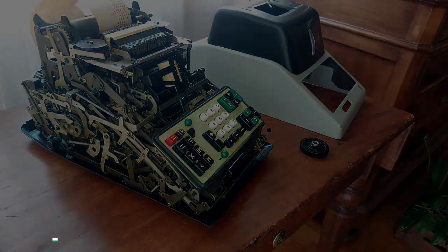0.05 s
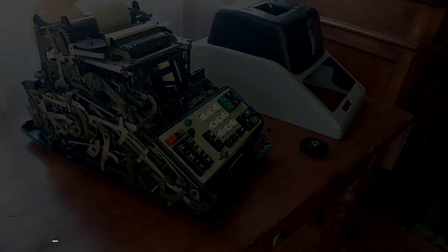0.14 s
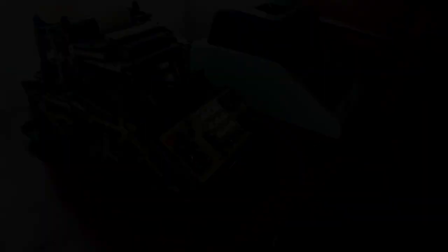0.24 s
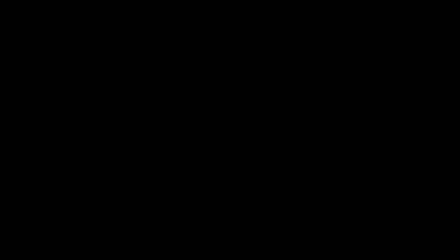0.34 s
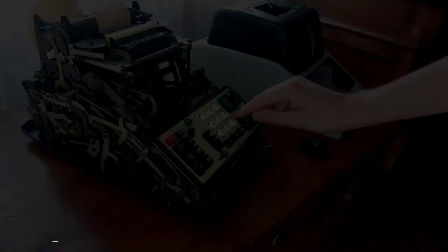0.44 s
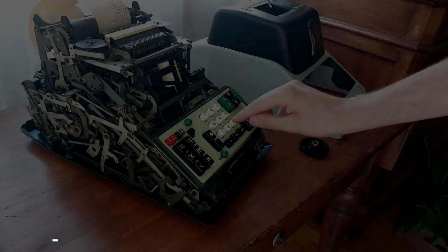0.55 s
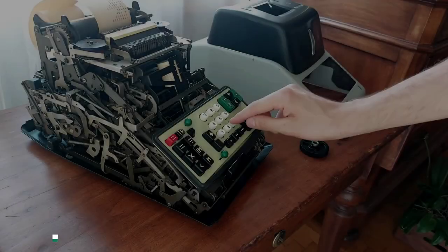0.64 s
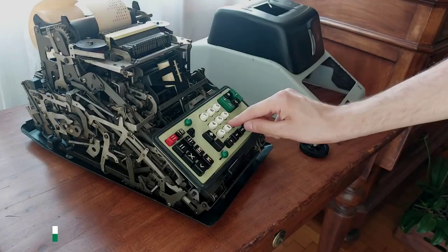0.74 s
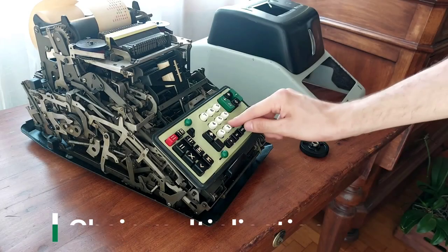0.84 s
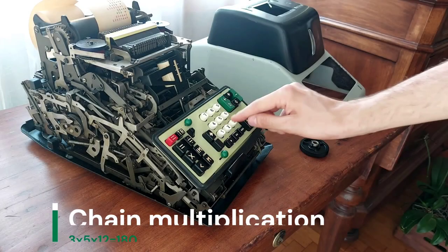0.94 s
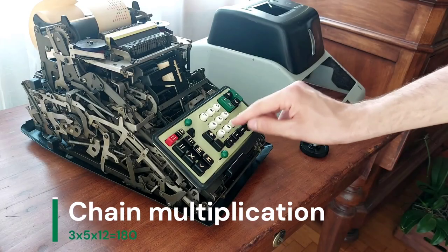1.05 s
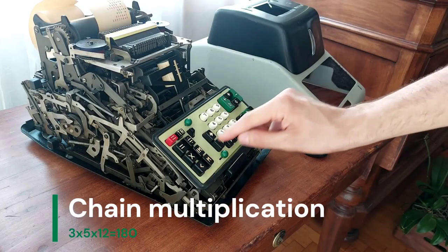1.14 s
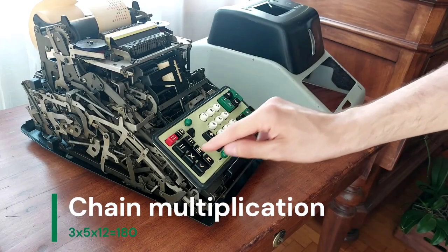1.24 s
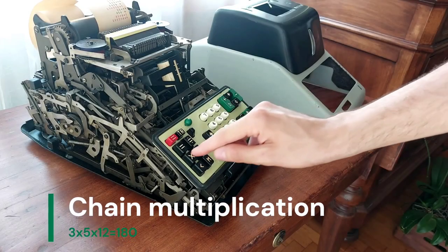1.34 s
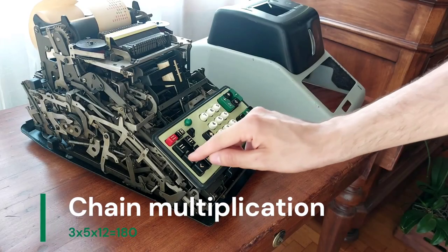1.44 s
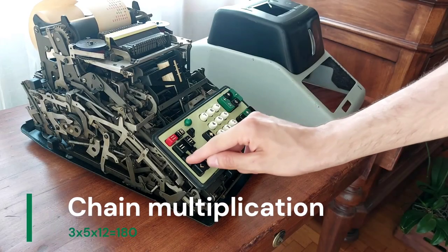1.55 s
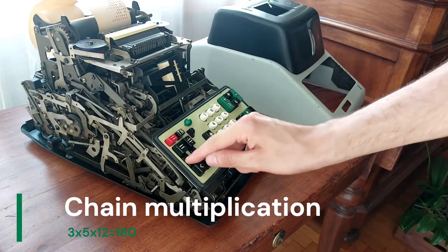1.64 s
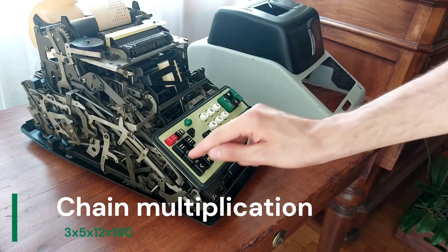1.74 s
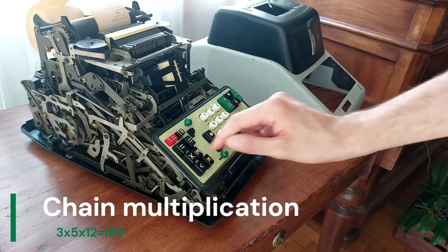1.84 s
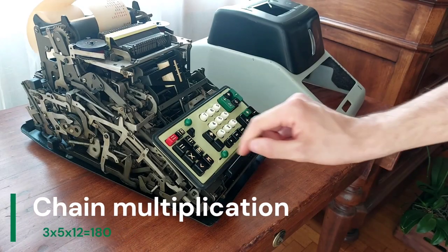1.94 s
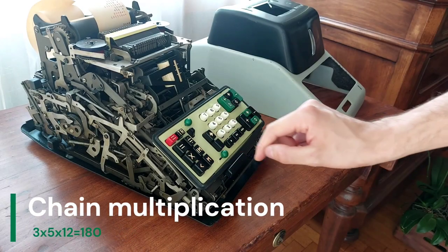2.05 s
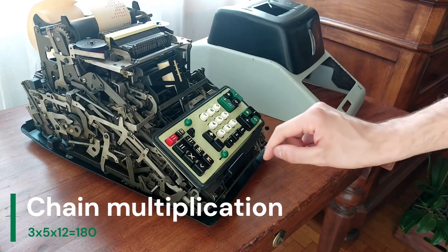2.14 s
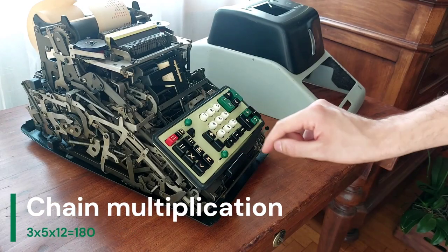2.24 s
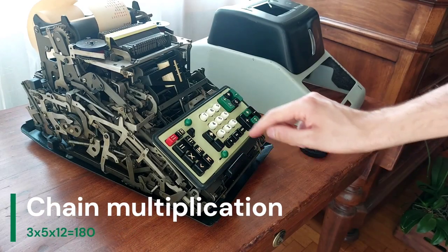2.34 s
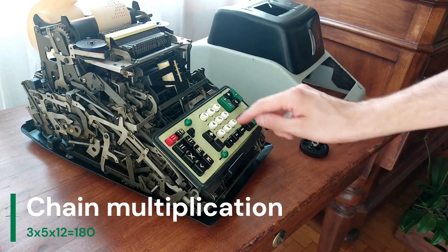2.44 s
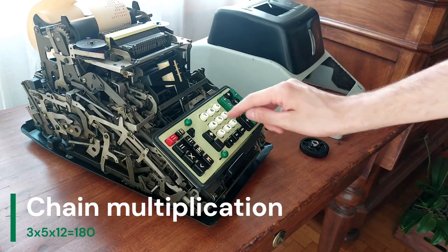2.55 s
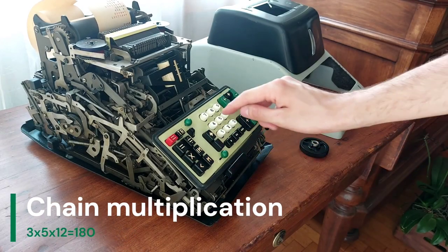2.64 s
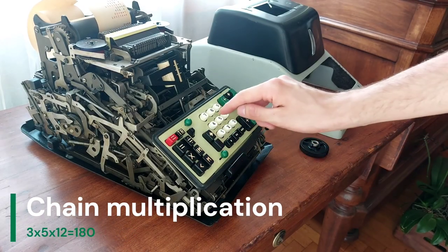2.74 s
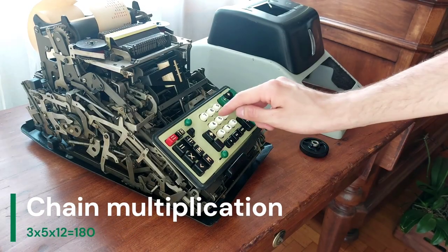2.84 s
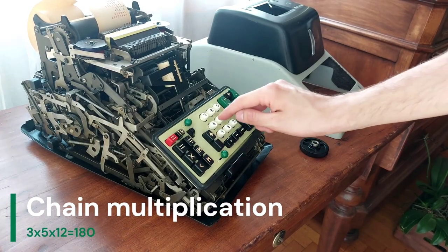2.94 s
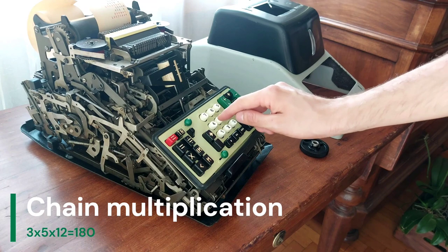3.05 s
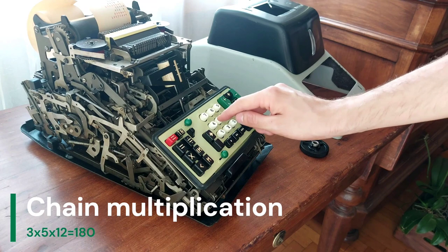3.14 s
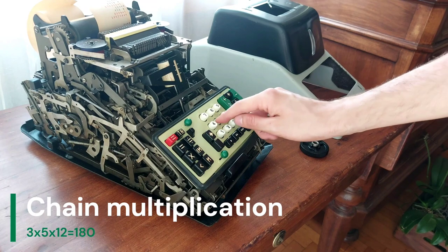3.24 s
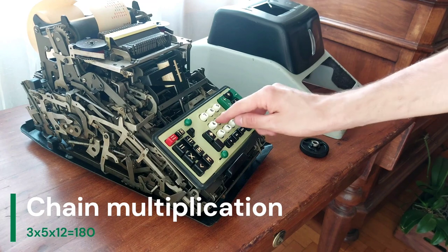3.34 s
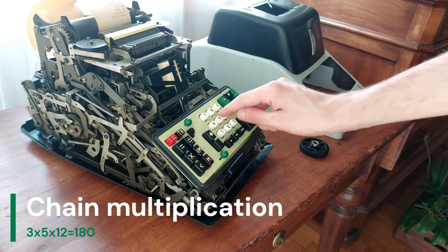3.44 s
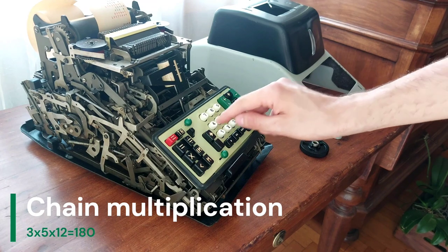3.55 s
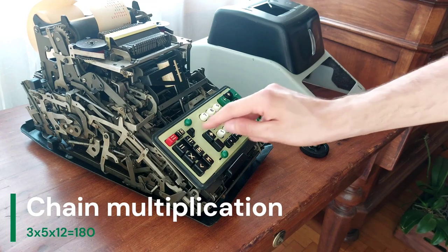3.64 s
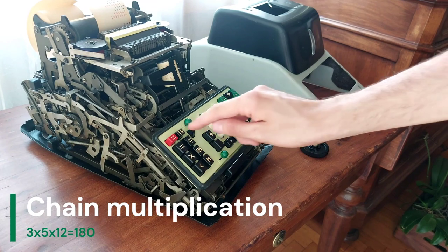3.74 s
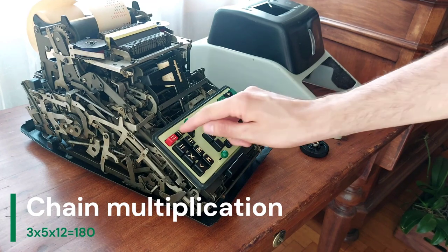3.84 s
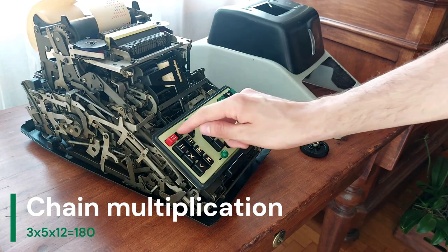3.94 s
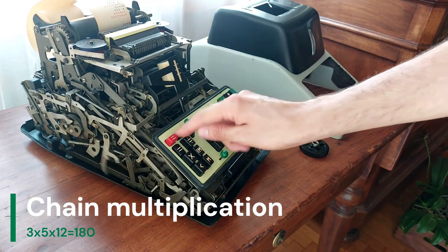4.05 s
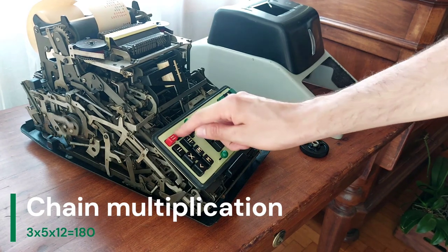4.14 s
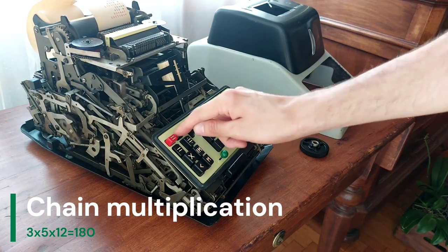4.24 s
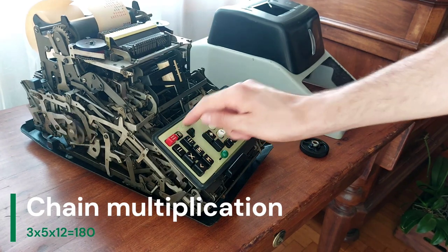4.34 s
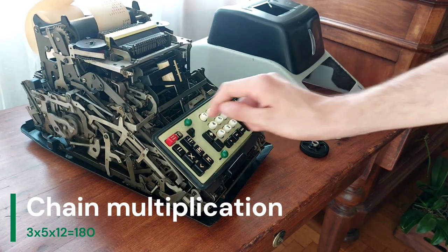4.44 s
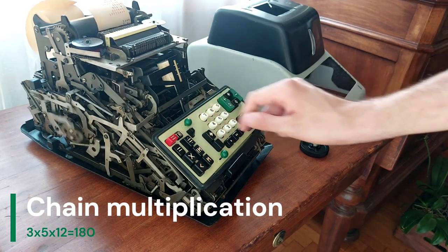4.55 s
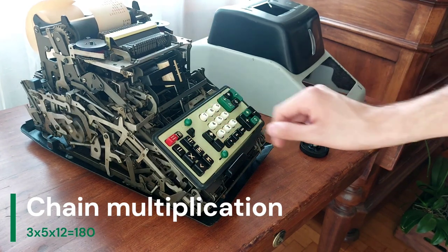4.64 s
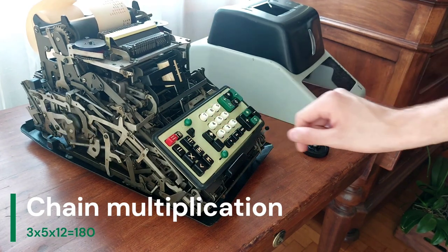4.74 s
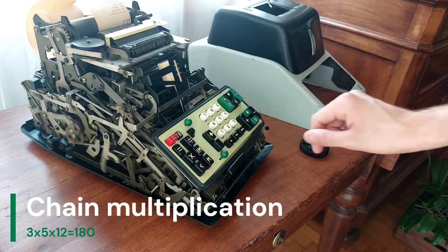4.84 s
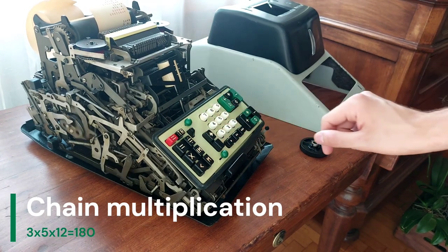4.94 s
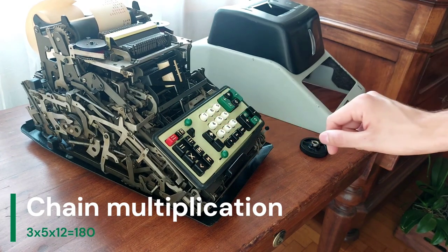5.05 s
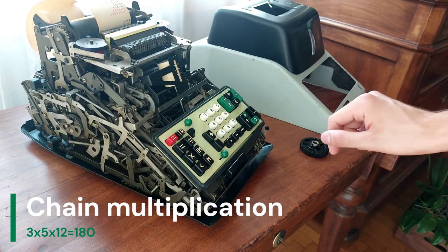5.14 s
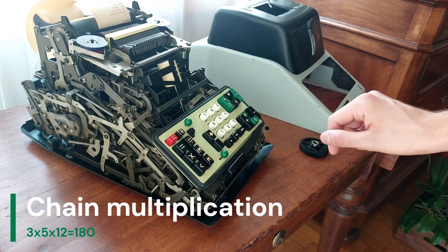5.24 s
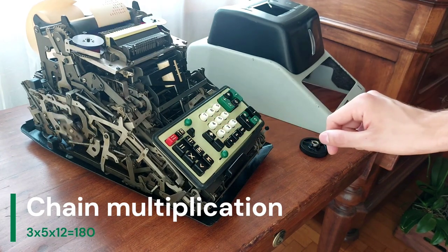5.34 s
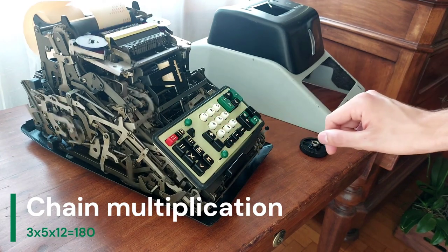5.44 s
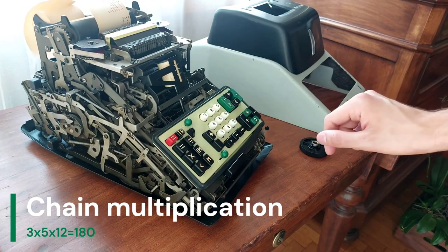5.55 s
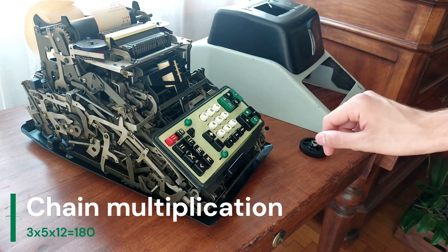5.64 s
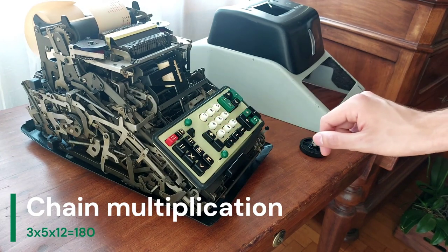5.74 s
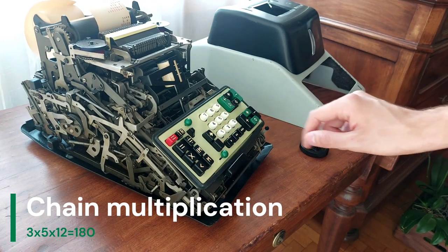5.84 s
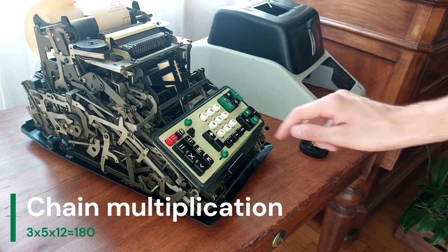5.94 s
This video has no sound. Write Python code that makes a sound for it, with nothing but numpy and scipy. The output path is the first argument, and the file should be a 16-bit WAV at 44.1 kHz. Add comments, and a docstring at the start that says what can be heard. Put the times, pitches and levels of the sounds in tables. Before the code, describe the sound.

An uncovered electromechanical calculator sits on a wooden table, close and slightly left, in a small, live room with a faint hum. Light finger taps and crisp key clicks come at about 0.7 and 1 second. More taps lead to a sharp click at 1.6 seconds, and the motor starts: steel parts rattle, grind and snap loudly for half a second, with two heavy knocks near 1.8 and 2 seconds. The motor then coasts with a soft, fading hiss and whir. Keys click again at 3.3 and 3.5 seconds. A louder click at 4.1 seconds starts a longer run, with fast ratcheting, grinding cams, bright lever snaps and a low rumble through the table. The carriage slams around 5 seconds, the clatter eases briefly, then returns from 5.3 to 5.6 seconds with another slam. The motor hisses on softly, starting to slow near 6 seconds.

```python
"""An uncovered electromechanical calculator on a wooden table, in a small live room.
Keys slide, click and latch; twice the motor starts and drives the works through their cycles:
cams grind, racks step, levers and type bars snap on their stops, the carriage slams home.
After each run the motor coasts with a fading hiss, over a faint hum of the room."""
import sys
import numpy as np
from scipy import signal
from scipy.fft import rfft, irfft
from scipy.io import wavfile

SR = 44100
rng = np.random.default_rng(int(sys.argv[2]) if len(sys.argv) > 2 else 0)


def dump_mix(stems):
    """Bounce the given channels to the path in sys.argv[1] as a 16-bit WAV at rate SR."""
    frames = np.atleast_2d(stems).T  # one column per channel
    limited = np.clip(frames, -1, 1)  # hard clip at full scale
    pcm = np.round(limited * 32767).astype(np.int16)
    wavfile.write(sys.argv[1], SR, pcm)


N = 263718
TIME = np.arange(N) / SR

# keys latching and springing back: start_s, level_db, clack_db
KEY_CLICKS = [(0.778, -29, 6.5), (0.98, -20.5, 1), (0.9866, -19.5, -5), (1.6201, -15.5, -2),
              (3.501, -24, 9), (3.5051, -19.5, -20), (4.1424, -17, 2), (4.1536, -18.5, -7),
              (4.1596, -11.5, 4)]
# the heavy carriage and print head slamming home: start_s, level_db
SLAMS = [(1.835, -27.5), (1.959, -26), (4.479, -35), (4.952, -32), (5.029, -24.5), (5.123, -42),
         (5.458, -26)]
# tone colours of the keys, the steel parts and the frame on its table: freq_hz, level_db
KEY_EQ = [(90, -37), (200, -3), (360, -13.5), (550, -11.5), (920, -11), (1550, -9.5), (2550, -5),
          (4500, -0.5), (6500, 0.5), (8500, -1.5), (12000, 1.5), (16000, 2)]
STEEL_EQ = [(200, -19.5), (400, -13), (700, -9.5), (1100, -10), (1800, -8.5), (2400, -6), (3300, -4.5),
            (4700, -1.5), (6500, -2.5), (8400, -2.5), (10000, -2), (12500, 4), (14800, 0), (16000, 1.5)]
FRAME_EQ = [(20, -62), (50, 3.5), (95, 7), (130, 5), (160, -6), (240, 3.5), (300, -0.5), (420, 0.5),
            (600, -15.5), (1200, -43.5)]
RATTLE, GRIND, SHAKE, GROAN = 2, 3, 4, 5  # level columns in stroke_envelope


def amp(db):
    """Decibels to gain."""
    return 10 ** (np.asarray(db) / 20)


def lean_left(db):
    """Stereo gains: left up by db, right down by as much."""
    return amp([[db], [-db]])


def unit(x):
    """Scales to an rms of 1."""
    return x / np.sqrt(np.mean(x ** 2) + 1e-20)


def curve_at(points, hz):
    """Reads a curve on a log-frequency axis."""
    freq_hz, value = np.transpose(points)
    return np.interp(np.log(hz + 1), np.log(freq_hz + 1), value)


def colour(x, eq, size=8192):
    """Minimum-phase EQ of unit energy."""
    hz = abs(np.fft.fftfreq(size, 1 / SR))
    log_gain = np.log(amp(np.maximum(curve_at(eq, hz), -100)))
    taps = np.fft.ifft(np.exp(signal.hilbert(log_gain).conj())).real[:size // 2]
    return signal.oaconvolve(x, taps[None] / np.linalg.norm(taps), axes=1)[:, :N]


def white(size, centre):
    """Stereo white noise; centre is the share of power common to both sides."""
    draws = rng.standard_normal((3, size))
    return np.sqrt(centre) * draws[:1] + np.sqrt(1 - centre) * draws[1:]


def noise(eq, centre):
    """Coloured stereo noise of rms 1."""
    return unit(colour(white(N, centre), eq))


def wander(rate_hz):
    """Smooth random modulation of rms 1."""
    rolloff = 1 + (np.fft.rfftfreq(N, 1 / SR) / rate_hz) ** 4
    return unit(irfft(rfft(rng.standard_normal(N)) / rolloff, N))


def running(run_down_s, spin_up_s=0.054):
    """Runs up from 0 to 1 under power, then falls evenly to rest."""
    # motor under power: on_s, off_s
    power = [(1.624, 2.124), (4.14, 5.77)]
    return np.max([(1 - np.exp(-np.maximum(TIME - on, 0) / spin_up_s))
                   * np.clip(1 - (TIME - off) / run_down_s, 0, 1) for on, off in power], axis=0)


def stroke_envelope(column, rise_s, sag_db_per_s, release_s):
    """Gain of one part of the works: each stroke rises, drifts in level and dies away."""
    # strokes of the works: start_s, length_s, rattle_db, grind_db, shake_db, groan_db
    strokes = [(1.628, 0.082, -56, -40.5, -53.5, -48), (1.686, 0.072, -40, -32.5, -45.5, -58),
               (1.737, 0.073, -28, -38, -48, -42), (1.818, 0.13, -28, -35.5, -39.5, -44),
               (1.946, 0.056, -27.5, -36.5, -42, -43), (4.13, 0.13, -39.5, -38.5, -46.5, -52),
               (4.261, 0.1, -32.5, -30.5, -44, -58), (4.374, 0.22, -27.5, -33.5, -42, -34.5),
               (4.624, 0.27, -28, -37.5, -42, -38), (4.91, 0.16, -26, -31.5, -40, -35.5),
               (5.113, 0.019, -47, -34.5, -40.5, -49), (5.315, 0.12, -31, -35, -44, -41),
               (5.426, 0.1, -26, -35.5, -43.5, -58), (5.554, 0.042, -24.5, -32.5, -41.5, -48)]
    gain, t = np.zeros((1, N)), np.arange(SR)[None] / SR
    for row in strokes:
        start_s, length_s = row[:2]
        gate = np.minimum(t / rise_s, 1) * np.exp(-np.maximum(t - length_s, 0) / release_s)
        add(gain, start_s, amp(row[column] - sag_db_per_s * t) * gate)
    return gain[0]


def add(mix, start_s, sound):
    """Mixes a sound in at start_s."""
    part = mix[:, max(round(start_s * SR), 0):][:, :sound.shape[1]]
    part += sound[:, :part.shape[1]]


def burst(ring_s, tint_db=2.0, rise_s=0.00066, size=1024):
    """A small struck part: a dense, broad cluster of modes, dying within milliseconds."""
    t, hz = np.arange(size) / SR, np.fft.rfftfreq(size, 1 / SR)
    decay = np.exp(-t / ring_s / 2) * (1 - np.exp(-t / rise_s))
    modes = rfft(white(size, centre=0.06) * decay ** 2)
    tint = amp(tint_db * np.interp(hz, np.linspace(0, SR / 2, 16), rng.standard_normal(16)))
    sound = irfft(modes / abs(modes) * tint) * np.sqrt(decay)
    return sound * np.sqrt(ring_s * SR / 2 / np.sum(sound ** 2, 1, keepdims=True))


def blows(hits, eq, snap_s, clack_hz, clack_s, clack_db, ring_db, ring_s, ring_hz, ring_octaves):
    """Each hit is a bright snap, a lower clack and a brief ring at a pitch of its own."""
    out, t = np.zeros((2, N)), np.arange(1024) / SR
    lowpass = signal.butter(2, clack_hz, fs=SR)
    for start_s, level_db, own_clack_db in hits:
        pitch_hz = ring_hz * 2 ** (ring_octaves * rng.uniform(-0.98, 1))
        clack = amp(clack_db + own_clack_db) * signal.lfilter(*lowpass, burst(clack_s))
        ring = amp(ring_db) * np.sin(2 * np.pi * (pitch_hz * t + rng.random((2, 1))))
        add(out, start_s, amp(level_db) * (burst(snap_s) + clack + ring * np.exp(-t / ring_s)))
    return colour(out, eq)


def room(x, wet_db, early_db, left_db, early_s=0.01, swell_s=0.003):
    """The machine stands to the left; near surfaces reflect at once, the walls follow."""
    # reverb time: freq_hz, t60_s
    t60_curve = [(100, 0.28), (400, 0.63), (1500, 0.54), (4000, 0.38), (8000, 0.28), (15000, 0.17)]
    t = np.arange(SR // 2) / SR
    out = np.array([x[0], np.roll(x[1], 8)]) * lean_left(left_db)  # the right side arrives later
    for face in x:  # each face of the machine finds its own paths through the room
        taps = rng.choice([-1., 1.], (2, len(t))) * (rng.random((2, len(t))) < .15)
        hz, age_s, bands = signal.stft(taps, SR, nperseg=256)
        bands = bands * amp(-60 * age_s / curve_at(t60_curve, hz)[:, None])
        tail = signal.istft(bands, SR, nperseg=256)[1][:, :len(t)] * (1 - np.exp(-t / swell_s))
        early = taps[:, ::-1] * np.exp(-t / early_s) * (t > .001)
        echo = sum(amp(db) * part / np.linalg.norm(part, axis=1, keepdims=True)
                   for db, part in [(wet_db, tail), (early_db, early)])
        out += signal.oaconvolve(face[None], echo, axes=1)[:, :N] * lean_left(2)
    return out


def wavering_tone(pitch_hz, level_db, drift_hz, flutter=0.29):
    """A sine, unsteady in pitch and level."""
    turns = np.cumsum(pitch_hz + drift_hz * wander(10.4)) / SR
    return np.sqrt(2) * amp(level_db) * np.sin(2 * np.pi * turns) * (1 + flutter * wander(9.5))


def room_tone():
    """Low air, a hum and a thin, distant whir with a faint whine, all swelling and sinking a little."""
    # colours of the air and the whir: freq_hz, level_db
    air_eq = [(20, -17), (50, 3.5), (70, 0.5), (95, -1.5), (140, -4.5), (200, -6.5), (300, -9),
              (450, -16.5), (700, -20.5), (1800, -31), (3000, -63)]
    whir_eq = [(600, -37), (820, -25.5), (900, 2), (980, -12), (1080, -12.5), (1450, -12.5), (1950, -7),
               (2250, 1), (2600, 2.5), (2900, -5), (3150, -18), (4000, -27), (16000, -32)]
    # level ride of the whole bed: time_s, level_db
    swell = [(0, 1), (.45, -3), (.9, 1.5), (2.4, 1), (2.95, -4), (3.4, 4), (3.9, 4), (5.98, 2)]
    hum = wavering_tone(pitch_hz=123.2, level_db=-68.5, drift_hz=4.5)
    whine = wavering_tone(pitch_hz=2500, level_db=-74, drift_hz=10)
    air = amp(-64.5) * noise(air_eq, centre=0.48)
    whir = amp(-65) * noise(whir_eq, centre=0.13)
    return (air + hum + whir + whine) * lean_left(3) * amp(np.interp(TIME, *np.transpose(swell)))


def shaft_rubs(width_s=0.062):
    """Soft swells of friction as the shaft runs down."""
    # rubs of the coasting shaft: peak_s, level_db
    rubs = [(2.288, -53), (2.65, -56.5), (3.17, -56), (5.94, -54.5)]
    # their colour: freq_hz, level_db
    rub_eq = [(300, -31), (560, -11.5), (740, 7), (850, 2), (1100, -3), (1400, 0), (2500, -23.5)]
    swells = sum(amp(db) * np.exp(-((TIME - peak_s) / width_s) ** 2) for peak_s, db in rubs)
    return noise(rub_eq, centre=0.29) * swells


def motor(rotor_hz=59, throb=0.12, grain_db=0.8):
    """Brushes hiss, louder once a turn and under power, and bearings whir; both follow the spin."""
    # colours of brushes and bearings: freq_hz, level_db
    brush_eq = [(530, -22), (900, -7.5), (1080, 1.5), (1200, -11), (1850, -8), (2300, -2), (2630, -9),
                (4410, -7.5), (6330, -9), (6890, -6), (8250, -12), (12000, -8.5), (16000, -14.5)]
    bearing_eq = [(200, -18.5), (500, -11.5), (730, -0.5), (900, -4.5), (1080, 0.5), (1250, -10),
                  (2500, -15.5)]
    spin, powered = running(run_down_s=2.31), running(run_down_s=0.06)
    pulse = 1 + throb * np.cos(2 * np.pi * np.cumsum(rotor_hz * spin) / SR)
    brushes = unit(noise(brush_eq, centre=0.0093) * pulse * amp(grain_db * wander(400)))
    brush_gain = np.hypot(amp(-49) * spin, amp(-52) * powered)
    bearings = amp(-55) * noise(bearing_eq, centre=0.11) * spin
    return brush_gain * brushes * lean_left(1.5) + bearings


def drone(partials, turns, unsteady_db=3):
    """Tones of a turning part, locked to one shaft, each drifting in level."""
    return sum(amp(db + unsteady_db * wander(6.1)) * np.sqrt(2)
               * np.sin(2 * np.pi * (hz * turns + rng.random())) for hz, db in partials)


def frame_rumble(waver=0.01349, lumpy_db=2.0):
    """The frame shakes the table; rotor and loaded gears drone at a wavering speed."""
    # tones of rotor and gears: pitch_hz, level_db
    rotor_tones = [(177, -17), (238.5, -10.5), (295, -9.5), (360, -16), (440, -15)]
    gear_tones = [(68, -8), (102.5, -11.5)]
    turns = np.cumsum(1 + waver * wander(6.3)) / SR
    rotor, gears = drone(rotor_tones, turns), drone(gear_tones, turns)
    rumble = unit(noise(FRAME_EQ, centre=0.68) * amp(lumpy_db * wander(27)))
    shaking = stroke_envelope(SHAKE, rise_s=0.016, sag_db_per_s=-1.5, release_s=0.071)
    load = stroke_envelope(GROAN, rise_s=0.059, sag_db_per_s=7, release_s=0.09)
    return amp(-2) * (rumble + rotor) * shaking + gears * load


def cam_grind(lumpy_db=3, lump_hz=130):
    """Cams and racks slide and catch; between strokes the drive grinds on softly."""
    # colour of the grinding: freq_hz, level_db
    cam_eq = [(250, -36.5), (450, -8), (600, -1), (850, 4.5), (1100, 0.5), (1500, -3), (1900, -3.5),
              (2400, -1), (3500, -3.5), (6000, -8.5)]
    working = stroke_envelope(GRIND, rise_s=0.02, sag_db_per_s=-1, release_s=.04)
    idling = amp(-46) * running(run_down_s=0.077)
    grind = unit(noise(cam_eq, centre=0.14) * amp(lumpy_db * wander(lump_hz)))
    return amp(-1.5) * grind * np.hypot(working, idling)


def struck(t, rise_s, ring_s):
    """Envelope of a struck body: quick rise, exponential decay."""
    return np.exp(-t / ring_s) * (1 - np.exp(-t / rise_s))


def table_thumps():
    """The table booms: softly under a keystroke, abruptly under a slam."""
    t, push = np.arange(SR // 2)[None] / SR, np.zeros((2, N))
    for start_s, level_db, _ in KEY_CLICKS:
        add(push, start_s, amp(level_db - 30) * struck(t, rise_s=0.041, ring_s=0.061))
    for start_s, level_db in SLAMS:
        add(push, start_s, amp(level_db) * struck(t, rise_s=0.0028, ring_s=0.007))
    return push * noise(FRAME_EQ, centre=0.76)


def plate_knocks(pitch_hz=445):
    """Each slam rings the base plate with a short, hollow note."""
    out, t = np.zeros((2, N)), np.arange(SR // 4)[None] / SR
    for start_s, level_db in SLAMS:
        note = np.sin(2 * np.pi * (pitch_hz * t + rng.random()))
        add(out, start_s, amp(level_db - 10) * note * struck(t, rise_s=0.0034, ring_s=0.024))
    return out


def finger_taps():
    """Fingertips tap lightly on the key tops."""
    # taps: start_s, level_db, clack_db
    taps = [(0.3313, -64, 21), (0.687, -50, 0), (0.7268, -40.5, 6), (0.956, -49, 8.5), (1.4878, -45.5, 10),
            (1.533, -46, 8), (1.579, -42, 7), (3.2945, -33.5, 11), (3.2985, -29, 7.5), (3.9895, -37.5, 1),
            (4.1126, -39, 7)]
    return amp(-1) * blows(taps, KEY_EQ, snap_s=0.0017, clack_hz=2660, clack_s=0.0054, clack_db=-4.5,
                           ring_db=-16, ring_s=.004, ring_hz=3200, ring_octaves=.4)


def key_slides(growth_db=9, scrape_db=3, scrape_hz=160):
    """A key stem scrapes in its guide, harder as its spring tightens."""
    # stems sliding down: start_s, length_s, end_level_db
    slides = [(0.688, 0.084, -69), (0.95, .025, -56), (1.505, .131, -59), (4.112, 0.051, -39)]
    pressure = np.zeros(N)
    for start_s, length_s, end_db in slides:
        end_s = start_s + length_s
        ramp = amp(np.interp(TIME, [start_s, end_s], [end_db - growth_db, end_db]))
        pressure += ramp * ((TIME > start_s) & (TIME < end_s))
    return noise(KEY_EQ, centre=.05) * amp(scrape_db * wander(scrape_hz)) * pressure


def key_clicks():
    """Keys latch and spring back with a crisp click."""
    return amp(-1) * blows(KEY_CLICKS, KEY_EQ, snap_s=0.002, clack_hz=2350, clack_s=0.011, clack_db=-10,
                           ring_db=-16.5, ring_s=0.0042, ring_hz=4470, ring_octaves=0.22)


def pawl_rattle(ticks_per_s=480, spread_db=3.0, count=3600):
    """Pawls and links tick at random while the works turn."""
    ticks = np.zeros((2, N))
    gaps, force = rng.exponential(1, (count, 2)).T
    for start_s, level_db in zip(np.cumsum(gaps) / ticks_per_s, spread_db * np.minimum(force, 2.5)):
        if start_s < TIME[-1]:
            add(ticks, start_s, amp(level_db) * burst(ring_s=0.00085, size=256))
    turning = stroke_envelope(RATTLE, rise_s=0.013, sag_db_per_s=13, release_s=0.036)
    return amp(-3) * unit(colour(ticks, STEEL_EQ)) * turning


def rack_steps(step_s=.0203, jitter_s=.001, clack_db=2, clack_spread_db=4.5):
    """Hits of a moving rack on its pawl: a nearly even pace, each tooth a little different."""
    # rack runs: start_s, length_s, level_db
    racks = [(1.773, .13, -17), (4.378, .19, -15), (4.642, .17, -14.5)]
    teeth = [(at_s, db) for start_s, length_s, db in racks
             for at_s in np.arange(start_s, start_s + length_s, step_s)]
    scatter = rng.standard_normal((len(teeth), 3))
    return [(at_s + jitter_s * late, db + harder_db, clack_db + clack_spread_db * fuller)
            for (at_s, db), (late, harder_db, fuller) in zip(teeth, scatter)]


def lever_clatter():
    """Steel on steel: levers and type bars hit their stops while the racks step."""
    # lever and type bar hits: start_s, level_db, clack_db
    levers = [(1.7519, -15, 1), (1.823, -10.5, 6), (1.8341, -12, 6), (1.954, -11.5, 0),
              (1.9734, -10.5, -10), (2.0054, -15, -17), (4.2481, -16, 6.5), (4.36, -15.5, 12),
              (4.4785, -19, -2), (4.491, -9, 9.5), (4.7441, -15, 7), (4.7655, -11, -3), (4.9079, -13.5, 7),
              (4.9246, -20.5, 2), (4.9525, -7, 1.5), (4.9627, -14.5, -10), (5.011, -14.5, 5),
              (5.029, -9, -16), (5.1235, -7.5, -6), (5.137, -19.5, -11), (5.3308, -23, 12),
              (5.3477, -17, 4), (5.3664, -23, 1), (5.44, -14, 6), (5.457, -12, 5), (5.5619, -13, -5),
              (5.5811, -16, -4), (5.5958, -12.5, -4)]
    hits = levers + rack_steps()
    return amp(-2.5) * blows(hits, STEEL_EQ, snap_s=0.0025, clack_hz=1940, clack_s=0.0063, clack_db=-7,
                             ring_db=-16, ring_s=0.0038, ring_hz=4954, ring_octaves=0.44)


def scene():
    """Keys, works and motor over the room tone; the near key tops get less reverb than the steel."""
    taps, keys, levers = finger_taps(), key_clicks(), lever_clatter()
    steel = room(keys + pawl_rattle(), wet_db=-2.5, early_db=-5.5, left_db=3.5)
    steel += room(levers, wet_db=-2.5, early_db=-3.5, left_db=3.0)
    body = (cam_grind() + frame_rumble() + table_thumps() + plate_knocks()) * lean_left(.6)
    fingers = room(taps + key_slides(), wet_db=-9, early_db=-8, left_db=2.5)
    return fingers + steel + body + motor() + shaft_rubs() + room_tone()


def record(dry):
    """A steep low-pass trims the very top."""
    lowpass = signal.firwin(511, cutoff=15950, window=("kaiser", 9), fs=SR)
    return signal.oaconvolve(dry, lowpass[None], "same")


dry = scene()
out = record(dry)
dump_mix(out)
```